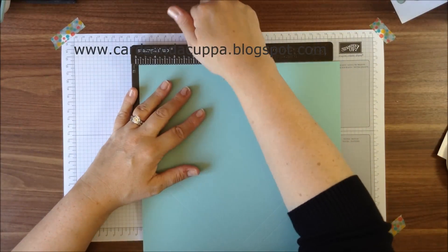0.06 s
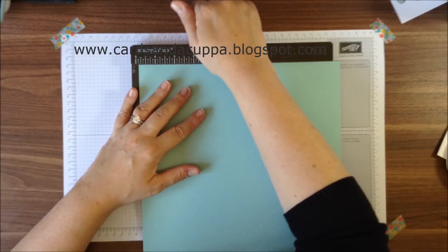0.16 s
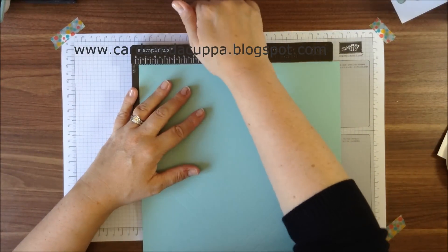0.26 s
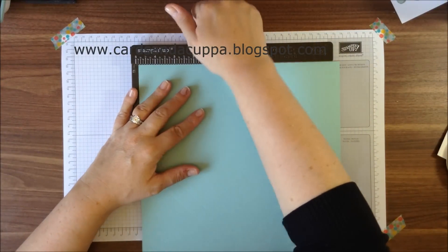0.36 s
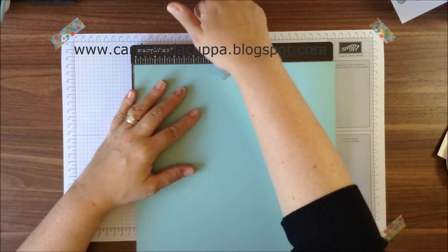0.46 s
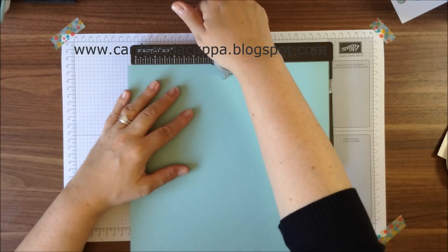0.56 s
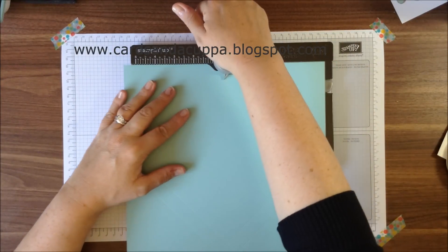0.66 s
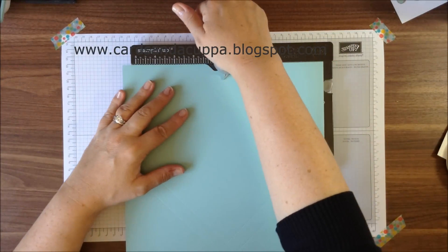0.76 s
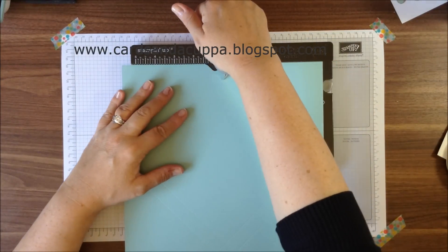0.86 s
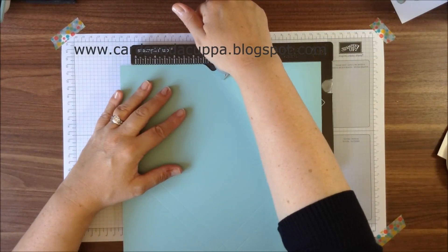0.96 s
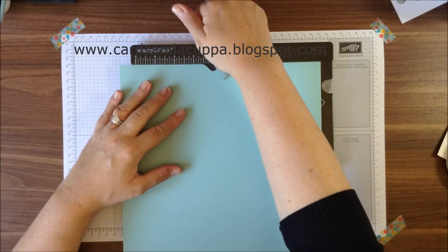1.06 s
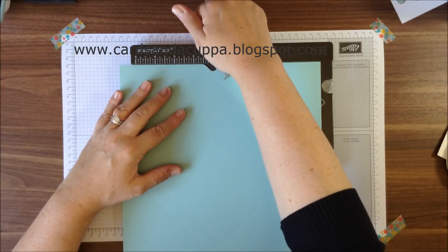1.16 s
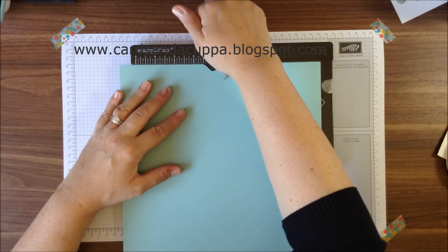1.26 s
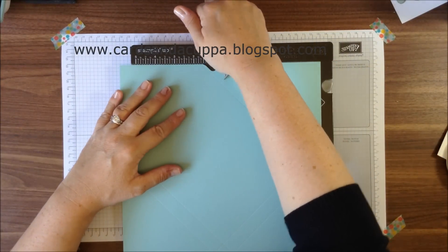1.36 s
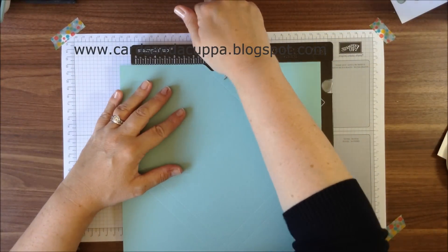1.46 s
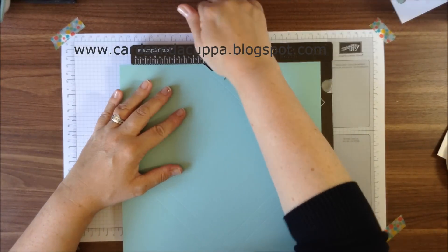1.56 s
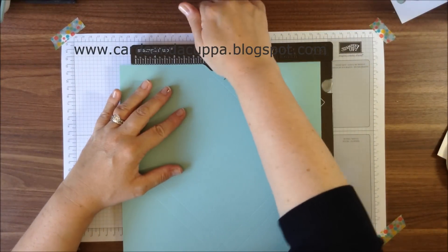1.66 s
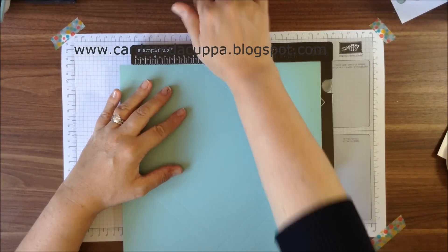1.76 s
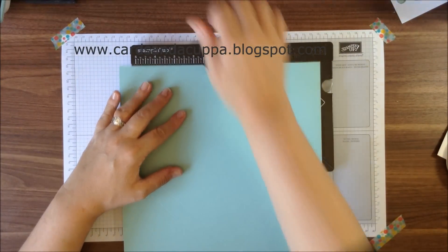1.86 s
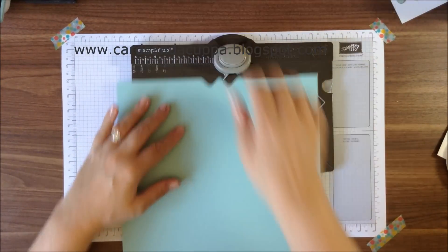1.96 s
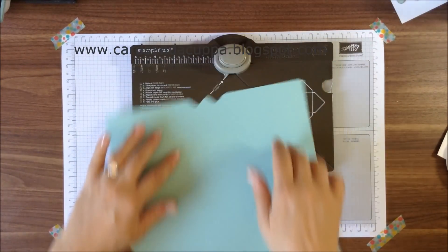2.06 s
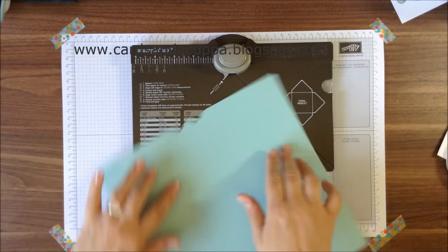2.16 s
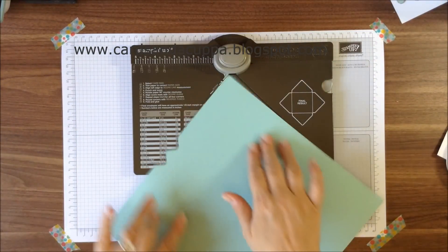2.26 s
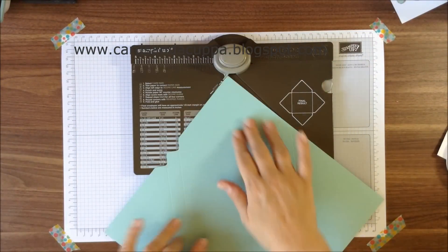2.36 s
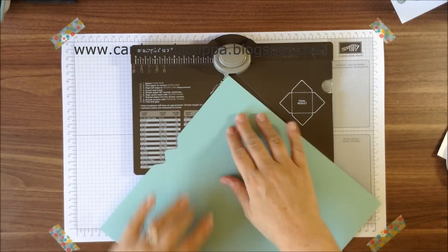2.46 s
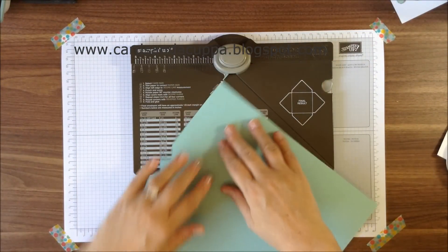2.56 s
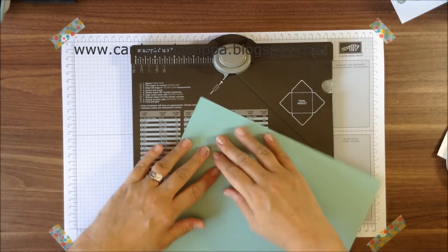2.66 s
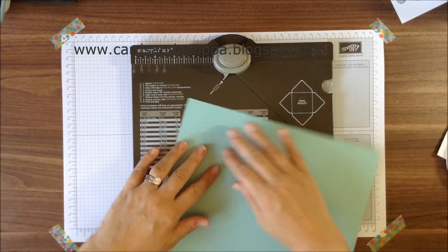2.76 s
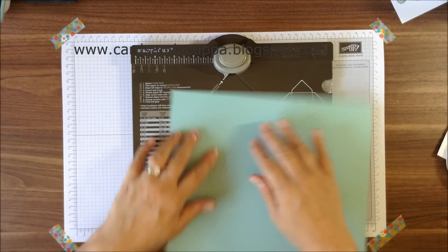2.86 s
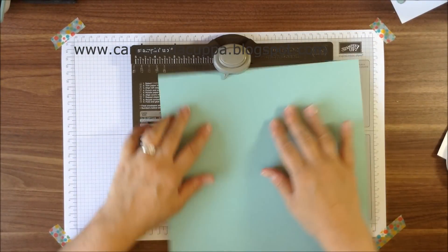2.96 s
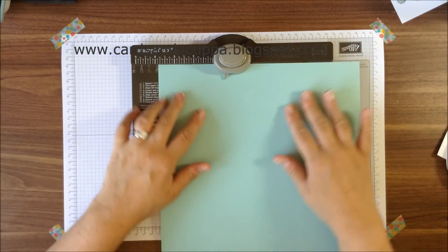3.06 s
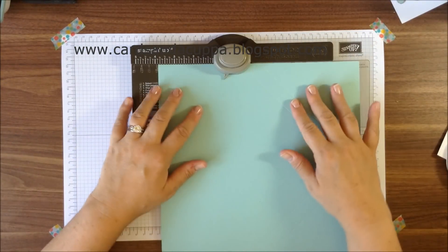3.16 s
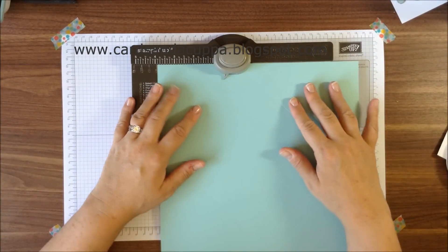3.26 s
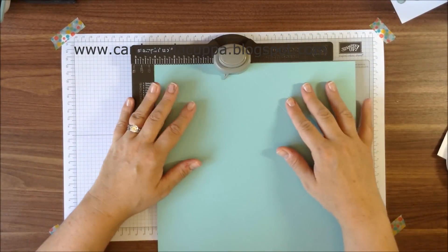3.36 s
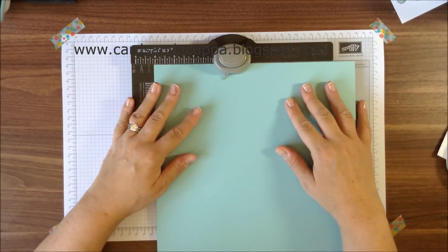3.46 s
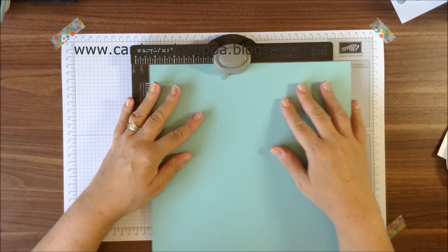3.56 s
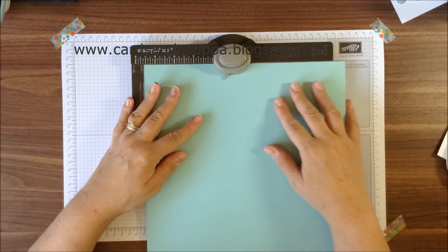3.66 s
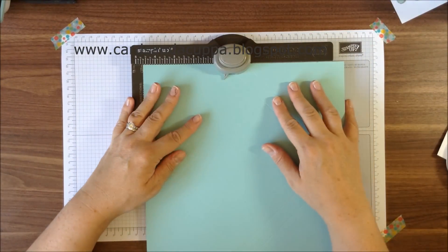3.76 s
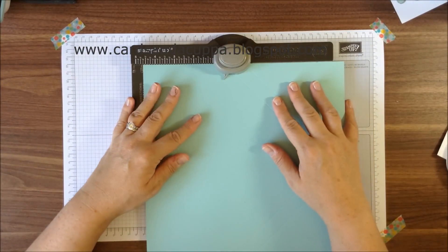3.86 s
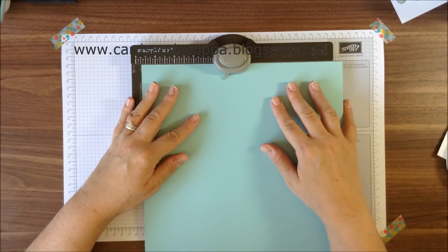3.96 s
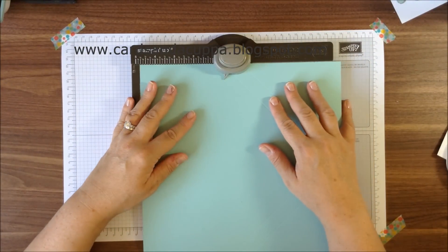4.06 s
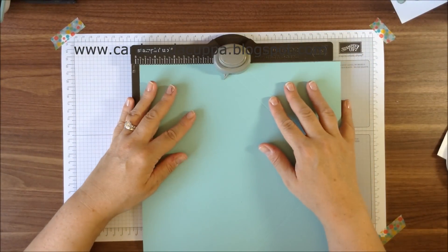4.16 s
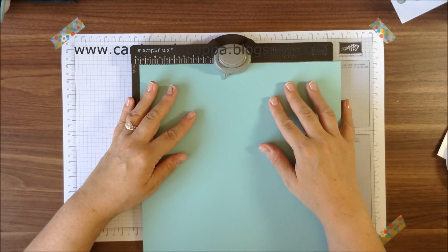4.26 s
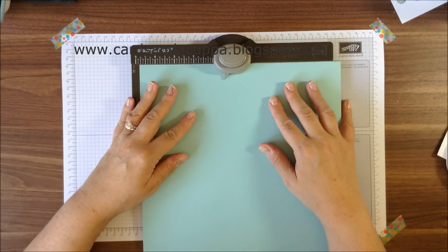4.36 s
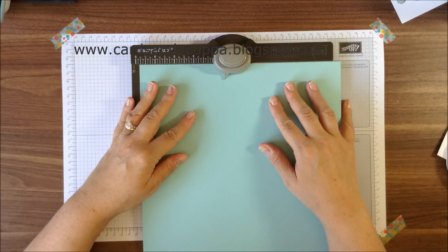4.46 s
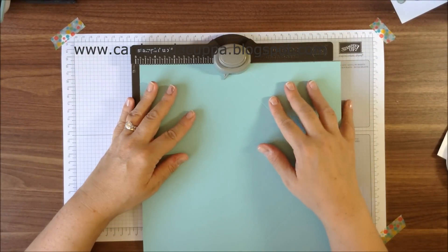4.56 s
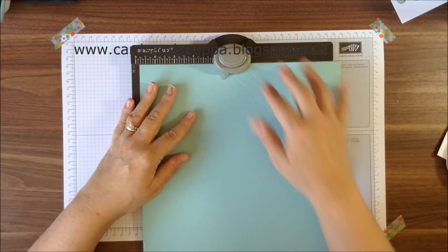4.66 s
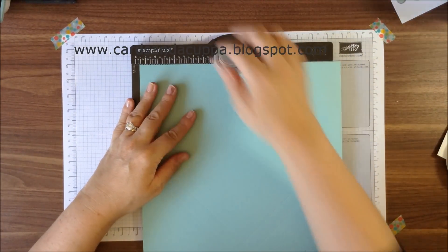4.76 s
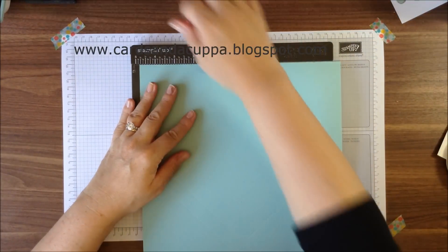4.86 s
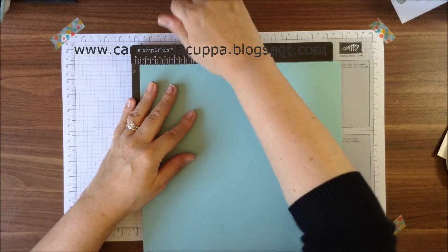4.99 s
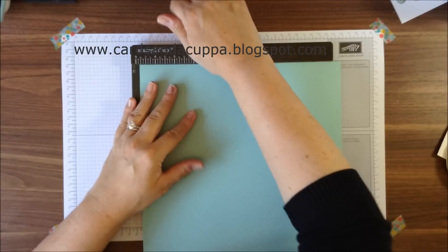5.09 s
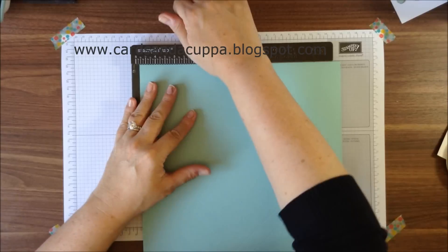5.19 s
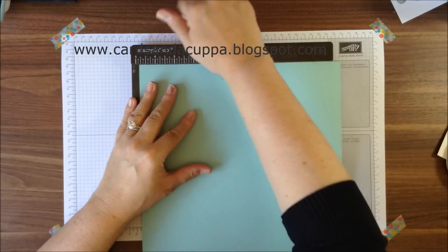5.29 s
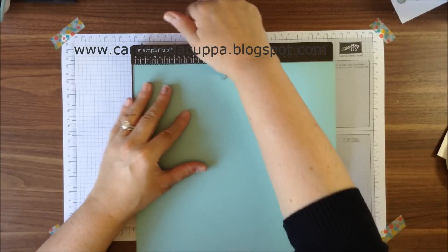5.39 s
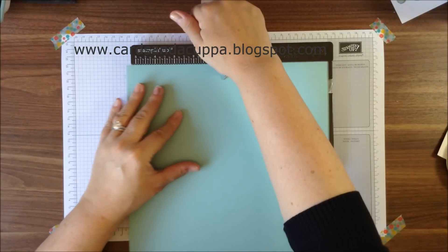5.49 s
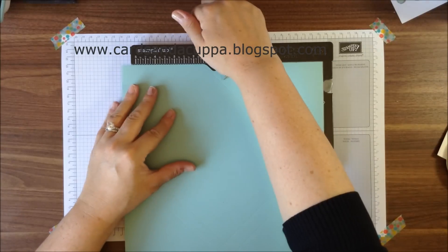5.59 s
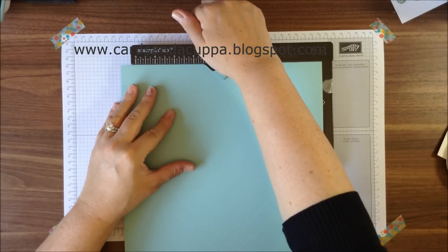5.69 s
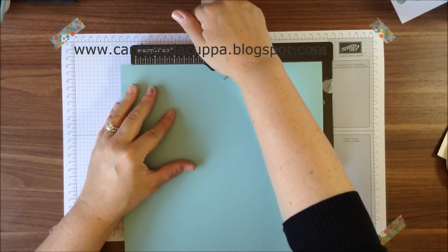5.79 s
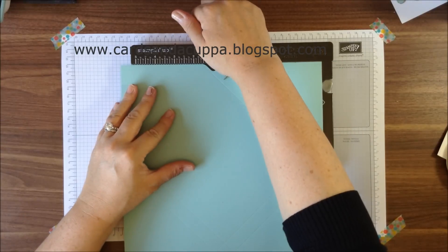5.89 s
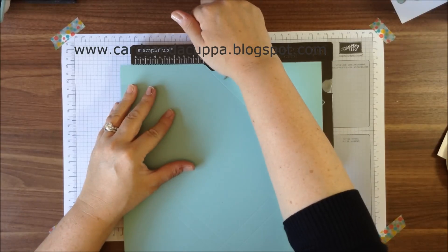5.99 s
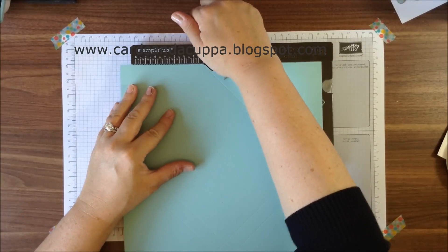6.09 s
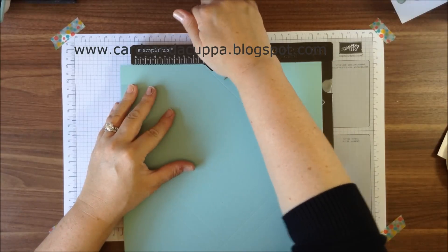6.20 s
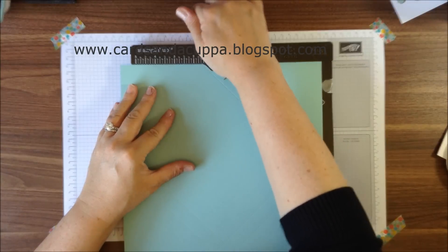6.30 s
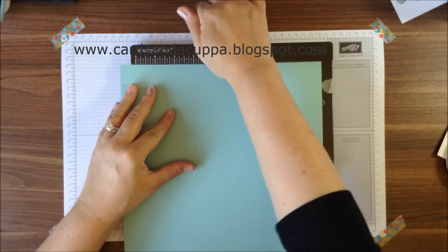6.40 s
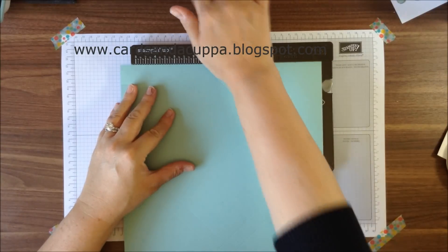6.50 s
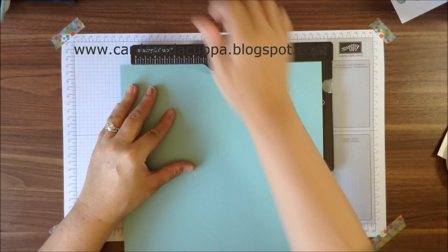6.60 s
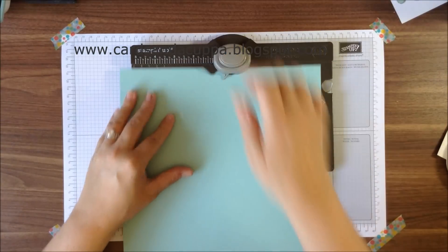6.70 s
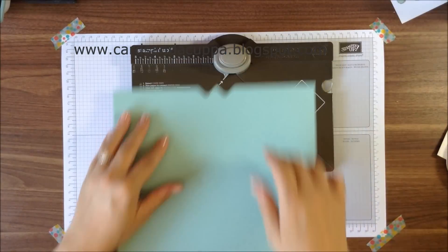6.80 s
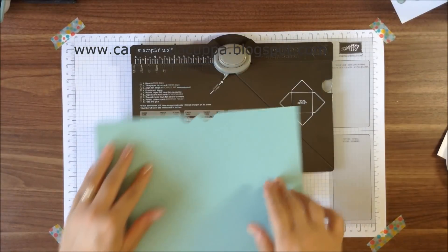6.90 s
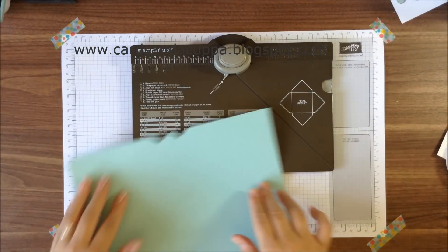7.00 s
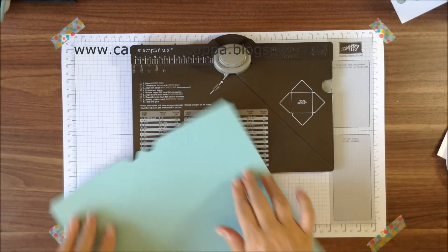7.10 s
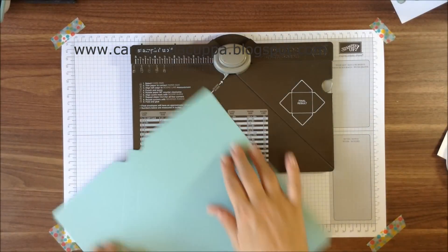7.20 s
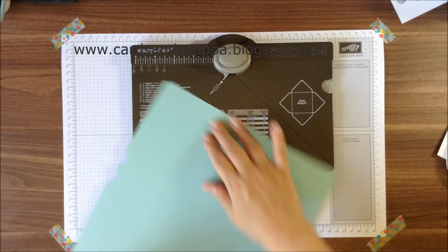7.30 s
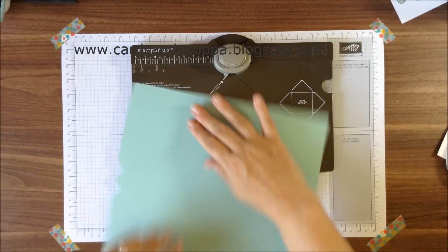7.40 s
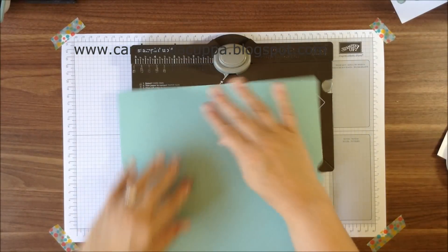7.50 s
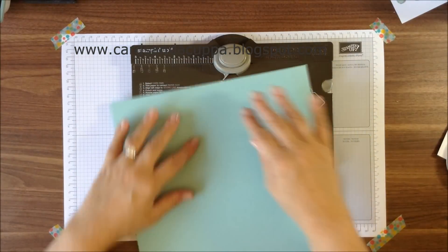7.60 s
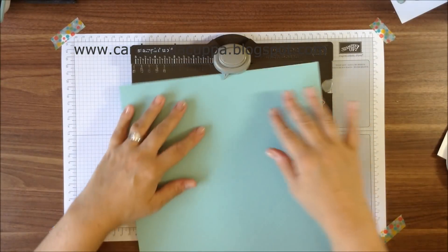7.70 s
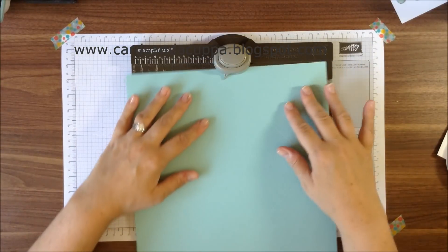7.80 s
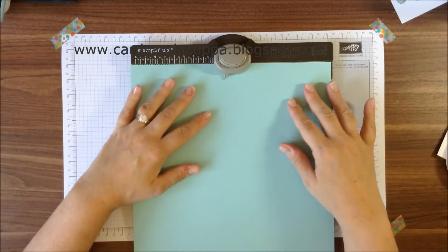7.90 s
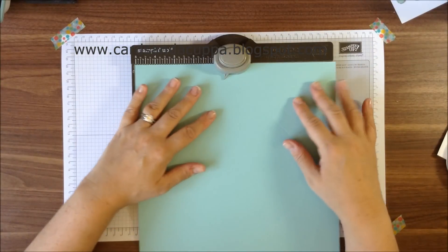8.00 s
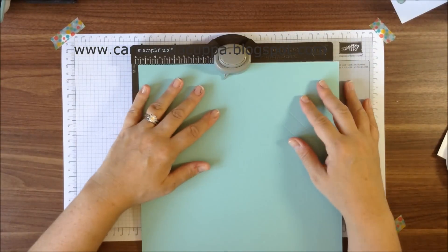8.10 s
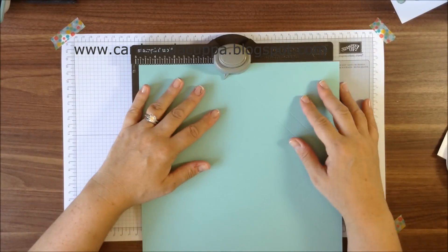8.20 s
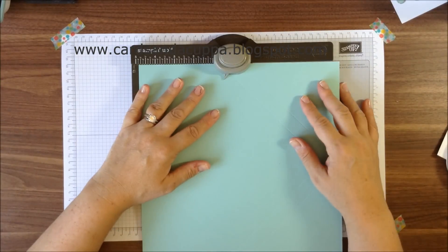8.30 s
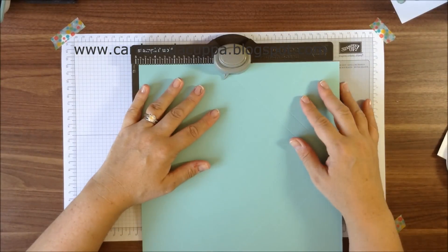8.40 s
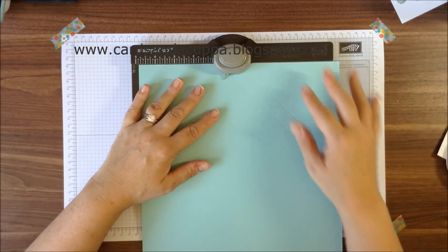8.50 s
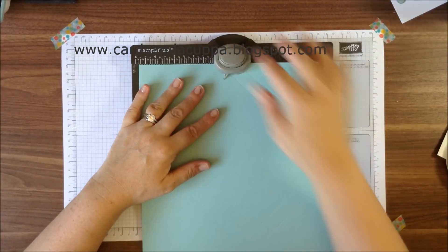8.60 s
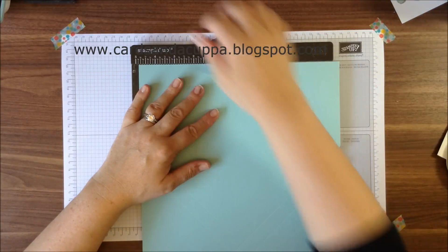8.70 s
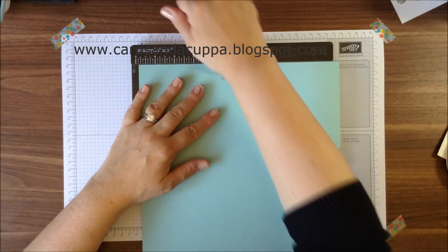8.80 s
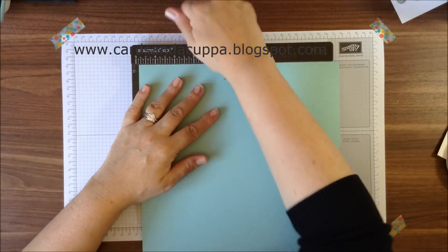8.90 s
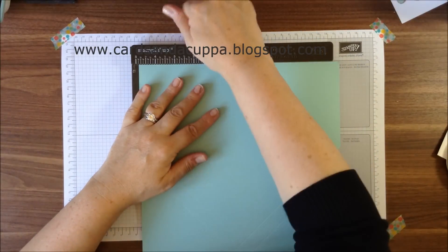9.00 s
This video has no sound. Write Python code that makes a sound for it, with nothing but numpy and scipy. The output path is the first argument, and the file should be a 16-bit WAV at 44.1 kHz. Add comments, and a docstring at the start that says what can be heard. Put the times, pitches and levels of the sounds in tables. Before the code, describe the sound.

Heard from close above a craft table in a small room, a hand punch cuts card with short, hard crunching clacks and quieter, faintly ringing spring returns. The punches come as two pairs and a final single cut. Between them the sheet slides and turns over the plastic board with papery swishes, light edge taps and soft fingertip rubbing. A faint steady hush lies underneath.

```python
"""A plastic punch board on a wooden craft table, heard from close above in a small room.
First come two presses: the button clicks, a blade crunches through card, slams down and springs back.
From 2 s the card is slid and turned: its face hisses, its edge scrapes and taps the guide rail,
and fingers rub it flat. Two more presses follow near 5 s and 6.3 s. The card is turned again,
flapping softly, and rubbed flat. One last crunch comes at 9 s."""
import sys
import numpy as np
from scipy import signal
from scipy.fft import rfft, irfft, next_fast_len
from scipy.io import wavfile
from scipy.ndimage import uniform_filter1d

SR = 44100
rng = np.random.default_rng(int(sys.argv[2]) if len(sys.argv) > 2 else 0)


def dump(signal):
    """Clip the signal to [-1, 1] and save it as 16-bit WAV at the path in sys.argv[1]."""
    limited = np.clip(np.atleast_2d(signal).T, -1, 1)
    pcm = np.round(limited * 32767).astype(np.int16)
    wavfile.write(sys.argv[1], SR, pcm)


N = 399105
TIME = np.arange(N) / SR
BANDS_HZ = 150 * 2 ** (np.arange(14) / 2)  # pitch bands, half an octave apart

# In the tables, "thump" is a hit's bass and "crack" its treble, both compared with its middle pitches.
# The button springs back against its stop:
# (time [s], level [dB], crack [dB], strongest pitch [Hz], level of the blade coming free [dB])
RELEASES = [(0.4125, -35, -4, 1193, -37.5), (1.825, -30.5, -1.5, 1320, -36.5),
            (5.3411, -29.5, -12, 1070, -43), (6.5488, -29, -1, 970, -34)]


def blade():
    """The slanted blade crunches through the card."""
    # each cut: (time [s], duration [s], level [dB], thump [dB], crack [dB], strongest pitch [Hz])
    cuts = [(0.1794, 0.011, -24.5, -7, -3.5, 648), (1.5592, .016, -21.5, -17.5, -3, 1200),
            (1.568, 0.016, -22, -17.5, -11.5, 1150), (5.0943, .019, -18.5, -13, -10, 1124),
            (6.2778, .017, -23, -12, -0.5, 859), (8.9883, 0.019, -23, -8.5, -5, 675)]
    return blows(cuts, shear, ring_db=-6, pitch_boost_db=7.5, room_db=-6.5)


def button():
    """The button clicks through its slack, slams down, pulls the blade free and hits its stop."""
    # the loose button shifts under the hand:
    # (time [s], level [dB], thump [dB], crack [dB], strongest pitch [Hz])
    slack_clicks = [(.089, -56.5, -1, -9.5, 1280), (0.1033, -42.5, -21, -10, 2000), (.137, -50, 3, -9, 604),
                    (.514, -62, -1, -12, 1300), (1.400, -62, -2, -24.5, 1000), (1.4537, -46, -29, -8, 1300),
                    (1.478, -56, -6, -6, 743), (5.022, -52, -8, -11, 995),
                    (5.0295, -33.5, -10.5, -7.5, 1198), (5.3103, -53, -9, 6, 3020),
                    (5.405, -52, -4, -8, 700), (6.083, -65, -15, -8, 2400), (6.159, -61.5, -8, -22.5, 998),
                    (6.211, -57.5, -8.5, -2.5, 803), (6.222, -52, -3, -8.5, 840),
                    (8.896, -60.5, 8, -3.5, 704), (8.936, -29.5, -11, -8, 2730)]
    # once through the card, the punch lands on the board:
    # (time [s], contact time [s], level [dB], crack [dB], strongest pitch [Hz])
    landings = [(.201, 0.003, -22.5, -15, 801), (0.2067, 0.0011, -19, -5.5, 2316),
                (1.5812, 0.0017, -18, -10.5, 1450), (5.1128, 0.0013, -21, -4, 700),
                (5.117, .0015, -20.5, -15, 1050), (6.3402, 0.00052, -27, -14, 607),
                (6.3434, .0011, -16.5, -4, 900)]
    # fill out each row to (time, contact time, level, thump, crack, strongest pitch)
    clicks = [(s, .0016, db, thump, crack, hz) for s, db, thump, crack, hz in slack_clicks]
    slams = [(s, contact, db, -8, crack, hz) for s, contact, db, crack, hz in landings]
    stops = [(s, .0017, db, -17, crack, hz) for s, db, crack, hz, _ in RELEASES]
    # just before the stop, the blade leaves the notch with a duller knock
    frees = [(s - .0098, .0018, free_db, -10.5, -10.5, 720) for s, *_, free_db in RELEASES]
    return (blows(slams, knock, ring_db=-3.5, pitch_boost_db=7, room_db=-6)
            + blows(stops, knock, ring_db=-5, pitch_boost_db=7.5, room_db=-8)
            + blows(clicks + frees, knock, ring_db=-6, pitch_boost_db=5, room_db=-6))


def spring(size=8192):
    """The coil spring sings briefly at each release, louder after a sharp stop."""
    # its thin ringing tones: (pitch [Hz], level compared with the stop's crack [dB])
    coil_tones = [(4400, -9.5), (7300, -16)]
    out, t = np.zeros(N), np.arange(size) / SR
    for s, stop_db, crack_db, *_ in RELEASES:
        for hz, db in coil_tones:
            close_hz = hz * (1 + .02 * rng.standard_normal((3, 1)))  # three close pitches waver together
            waves = np.sin(2 * np.pi * (close_hz * t + rng.random((3, 1))))
            ping = unit(waves.sum(axis=0)) * die_away(t, fade_s=.17)
            add(out, s, undb(stop_db + crack_db + db) * ping)
    return out


def rail_taps():
    """The light card taps the guide rail or catches, barely ringing the board."""
    # each touch: (time [s], contact time [s], level [dB], crack [dB], strongest pitch [Hz])
    touches = [(2.036, 0.008, -51, -17, 680), (2.3248, 0.0034, -31, -11, 1010),
               (2.528, .0028, -52.5, -8, 1900), (3.0118, 0.0029, -30, -13, 736),
               (3.090, 0.0017, -37.5, -22.5, 679), (5.453, 0.0014, -45, -22.5, 788),
               (5.582, .0013, -55.5, -29, 800), (6.784, 0.0021, -46, -15, 1720),
               (6.823, .003, -48, -10, 1600), (7.210, 0.0034, -48, 0, 796), (7.645, 0.0036, -59, 0, 1700),
               (7.958, .0029, -57.5, -18, 700)]
    thump_db = -25.5
    taps = [(s, contact, db, thump_db, crack, hz) for s, contact, db, crack, hz in touches]
    return blows(taps, knock, ring_db=-14, pitch_boost_db=7.5, room_db=-7.5)


def sliding_card():
    """The card's face hisses and its edge scrapes as it slides, or as the rising blade drags on it."""
    # pushes and turns: (time of full speed [s], hold [s], hiss level [dB], scrape level [dB])
    pushes = [(.49, 0.14, -58.5, -60), (1.98, 0.12, -49, -52.5), (2.055, 0.017, -52, -43.5),
              (2.17, 0.11, -42, -46.5), (2.295, 0.01, -35.5, -45.5), (2.56, 0.063, -54.5, -53),
              (2.645, 0.094, -43, -47.5), (2.82, 0.074, -41.5, -44), (2.925, 0.071, -41.5, -40.5),
              (3.615, 0.092, -56.5, -55), (5.44, .17, -58.5, -58.5), (6.785, 0.062, -48.5, -46),
              (6.9, 0.078, -46.5, -52), (7.01, .11, -45, -50), (7.15, 0.077, -42.5, -47),
              (7.31, .065, -38.5, -44), (7.44, 0.051, -45.5, -43), (7.69, 0.033, -48.5, -48.5),
              (7.78, 0.053, -55.5, -65.5), (7.86, 0.076, -54, -56), (8.05, 0.046, -55.5, -58.5),
              (8.9, 0.015, -54.5, -56.5)]
    # tone of the hissing face: (pitch [Hz], level [dB])
    hiss_tone = [(500, -17), (2000, -5), (3700, -1.5), (5200, -2), (8000, -2.5), (12000, -2), (15500, -4.5)]
    # tone of the scraping edge: (pitch [Hz], level [dB])
    scrape_tone = [(120, -32), (300, -18), (420, -7), (600, -10), (860, 1.5), (1050, -6), (1400, -2),
                   (1800, -0.5), (2600, -7), (4000, -12.5), (9000, -23)]
    # pitches that the edge sets ringing: (pitch [Hz], width [Hz], boost [dB])
    edge_peaks = [(677, 26.6, 12), (864.4, 22, 9), (1766, 120, 5.5)]
    drag_s, drag_hiss_db, drag_scrape_db = .015, -51, -47.5
    blade_drags = [(s - drag_s, drag_s, drag_hiss_db, drag_scrape_db) for s, *_ in RELEASES]
    slides = list(pushes) + blade_drags
    hiss = colour(friction(grain_db=2.5, flutter_db=1.44, flutter_hz=63), hiss_tone)
    scrape = colour(friction(grain_db=3, flutter_db=2, flutter_hz=64), scrape_tone, edge_peaks)
    return hiss * strokes(slides) + scrape * strokes(slides, level_column=3)


def fingers():
    """Fingertips rub the card flat with a soft, grainy swish."""
    # each rub: (time of full speed [s], hold [s], level [dB])
    rubs = [(.67, 0.39, -62.5), (3.24, 0.26, -58), (4.03, .07, -64.5), (8.13, 0.25, -62.5),
            (8.52, .1, -68.5)]
    # tone of skin on card: (pitch [Hz], level [dB])
    rub_tone = [(100, -15), (220, -6), (380, -2), (550, -8), (800, -1.5), (1700, -5), (3000, -7.5),
                (3800, -12), (4900, -8.5), (6000, -15.5), (15000, -16.5)]
    return colour(friction(grain_db=3, flutter_db=1, flutter_hz=44), rub_tone) * strokes(rubs)


def flapping_card():
    """The sheet bends and gives a low flap as it is turned."""
    # each flap: (time of full speed [s], hold [s], level [dB])
    flaps = [(6.99, .015, -62), (7.23, 0.053, -58)]
    # tone of the bending sheet: (pitch [Hz], level [dB])
    flap_tone = [(70, -28.5), (115, 2), (160, -2.5), (300, -13), (900, -39)]
    return colour(rng.standard_normal(N), flap_tone) * strokes(flaps)


def table_echoes(x, echo_db, size=882):
    """The table top and nearby things bounce the treble back at once, making it sound hollow."""
    t = np.arange(size) / SR
    bounces = rng.standard_normal(size) * knock(t, .002)
    treble = signal.sosfilt(signal.butter(4, 1400, "high", fs=SR, output="sos"), bounces)
    return x + undb(echo_db) * signal.oaconvolve(x, unit(treble) / np.sqrt(size))[:N]


def background():
    """A faint, steady hush fills the room."""
    # tone of the hush: (pitch [Hz], level [dB])
    hush_tone = [(40, -10), (80, -13.5), (120, -6.5), (180, -2), (400, -2.5), (700, -7), (1800, -11),
                 (15000, -14)]
    return undb(-62.5) * colour(rng.standard_normal(N), hush_tone)


def blows(hits, force, ring_db, pitch_boost_db, room_db, size=12288):
    """Each hit is a short burst of vibration, then the board rings and the room echoes."""
    # ringing tones of the board and table top: (pitch [Hz], level [dB])
    board_tones = [(121, 3), (183, 7.5), (410, -1.5), (594, -4), (678, -5.5), (865, -8.5), (1085, -5.5),
                   (1186, 1), (1241, -0.5), (1414, -8), (1834, -7.5), (1926, -8.5), (2483, -11.5)]
    # how long the room echoes: (pitch [Hz], time to fade by 60 dB [s])
    room_fades = [(120, 0.2), (500, 0.14), (1200, 0.23), (7000, 0.24), (14000, .22)]
    out, t = np.zeros(N), np.arange(size) / SR
    board_hz, board_db = np.transpose(board_tones)
    ring_fade = die_away(t, fade_s=.23)
    room_fade = die_away(t, at(BANDS_HZ, room_fades)[:, None])
    echo_db = room_db + at(BANDS_HZ, [(150, 3.5), (450, -.4), (4000, 1.74), (14000, -.9)])
    for s, length, db, thump_db, crack_db, hz in hits:
        tone = [(170, thump_db + 2.5), (300, thump_db - 9), (440, thump_db / 2 + 1),
                (750, 0), (2200, -2.5), (7500, crack_db), (14000, crack_db - 4)]
        # the spot that is hit favours one broad range of pitch
        favoured = np.exp(-(np.log2(BANDS_HZ / hz) / .38) ** 2)
        band_db = db + at(BANDS_HZ, tone) + pitch_boost_db * favoured - 5
        push = force(t, length)
        burst = undb(band_db) @ even(noise_bands(size) * push)
        build_up = np.cumsum(push) / push.sum()  # ring and echoes grow while the force acts
        echoes = undb(band_db + echo_db) @ even(noise_bands(size) * room_fade * build_up)
        # the weight of the hand detunes the board a little each time
        detuned_hz = board_hz * (1 + .006 * rng.standard_normal(len(board_hz)))
        waves = np.sin(2 * np.pi * (detuned_hz[:, None] * t + rng.random((len(board_hz), 1))))
        ring = undb(ring_db + board_db + np.interp(board_hz, BANDS_HZ, band_db)) @ waves
        add(out, s, burst + echoes + ring * ring_fade * build_up)
    return out


def shear(t, duration):
    """The force of a cut: the blade snaps into the card, bites ever more of it, then runs out."""
    bite = np.sin(np.pi * np.minimum(t / duration, 1) ** .85) ** 2
    return bite + .45 * knock(t, duration / 10)


def knock(t, contact):
    """The force of a hard hit: it jumps up, then dies away."""
    return t / contact * np.exp(-t / contact)


def friction(grain_db, flutter_db, flutter_hz):
    """Countless fibres catch and let go, a few much harder than the rest, under uneven pressure."""
    catches = rng.standard_normal(N) * undb(grain_db * np.minimum(rng.exponential(size=N), 6))
    step = int(SR / flutter_hz)
    jumps = np.repeat(rng.standard_normal(N // step + 1), step)
    pressure = unit(uniform_filter1d(jumps, step))[:N]
    return catches * undb(flutter_db * pressure)


def strokes(moves, level_column=2):
    """Loudness over time of hand strokes: each swells to full speed, holds, then fades."""
    swell_db_per_s, fade_db_per_s = 300, 142
    power = np.zeros(N)
    for move in moves:
        t, hold = TIME - move[0], move[1]
        below_db = swell_db_per_s * np.maximum(-t, 0) + fade_db_per_s * np.maximum(t - hold, 0)
        heard = below_db < 60
        power[heard] += undb(move[level_column] - below_db[heard]) ** 2
    return np.sqrt(power)


def colour(x, tone, peaks=()):
    """Give a sound a tone curve with ringing peaks on top, at an average strength of 1."""
    size = next_fast_len(len(x))
    hz = np.arange(size // 2 + 1) * SR / size
    peak_db = sum(boost / (1 + (2 * (hz - pitch) / width) ** 2) for pitch, width, boost in peaks)
    spectrum = rfft(x, size) * undb(at(hz, tone) + peak_db)
    return unit(irfft(spectrum, size)[:len(x)])


def noise_bands(size):
    """White noise split into the pitch bands, one row for each."""
    hz = np.arange(size // 2 + 1) * SR / size
    octaves_away = np.abs(np.log2(hz + 1) - np.log2(BANDS_HZ)[:, None])
    share = np.maximum(1 - 2 * octaves_away, 0)
    return irfft(rfft(rng.standard_normal(size)) * share, size)


def even(bands):
    """Give every band the energy of 10 ms of sound at strength 1."""
    return bands / np.sqrt(np.sum(bands ** 2, axis=1, keepdims=True) / (SR / 100))


def die_away(t, fade_s):
    """A fade that drops 60 dB in fade_s seconds."""
    return np.exp(-np.log(1000) * t / fade_s)


def at(hz, points):
    """Read a curve of (pitch, value) points at the pitches hz, going by octaves."""
    pitch, value = np.transpose(points)
    return np.interp(np.log(hz + 1), np.log(pitch), value)


def undb(db):
    """Turn decibels into a volume factor."""
    return 10 ** (np.asarray(db) / 20)


def unit(x):
    """Scale to an average strength (rms) of 1."""
    return x / np.sqrt(np.mean(x ** 2))


def add(track, s, sound):
    """Mix a sound into the track at s seconds."""
    start = int(s * SR)
    track[start:start + len(sound)] += sound[:N - start]


def scene():
    """Punch and card on the table, over the faint background, in one channel."""
    punch = blade() + button() + spring()
    card = rail_taps() + sliding_card() + fingers() + flapping_card()
    return (table_echoes(punch + card, echo_db=-10.5) + background())[None]


def record(dry):
    """Filter out rumble, round off the loudest peaks and cut the highest treble."""
    no_rumble = signal.sosfilt(signal.butter(6, 98, "high", fs=SR, output="sos"), dry)
    rounded = no_rumble / (1 + (no_rumble / .9) ** 4) ** .25
    return signal.sosfilt(signal.ellip(10, .2, 70, 15500, fs=SR, output="sos"), rounded)


dry = scene()
out = record(dry)
dump(out)
```